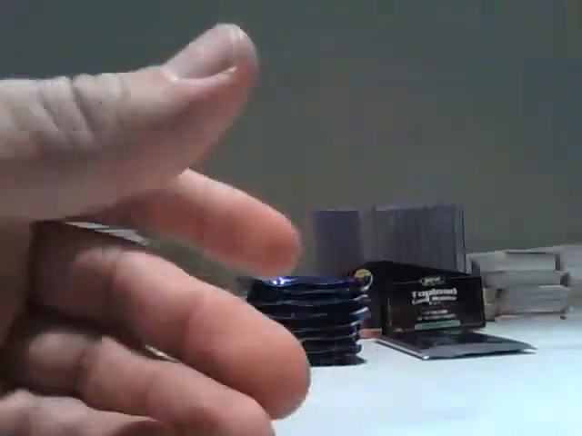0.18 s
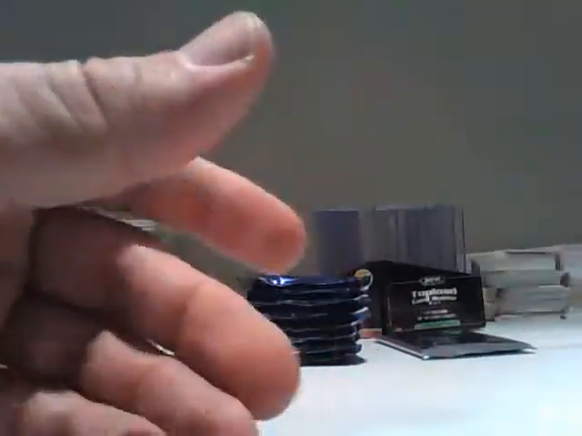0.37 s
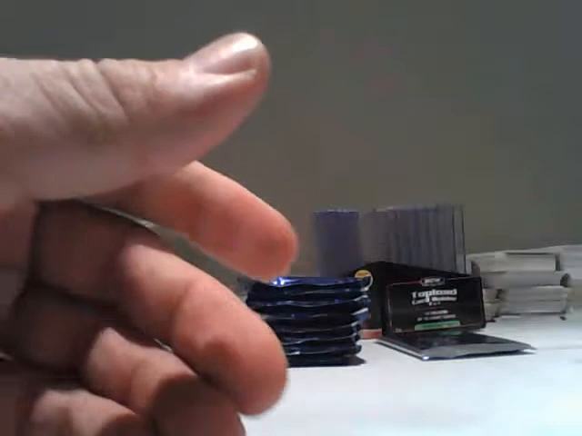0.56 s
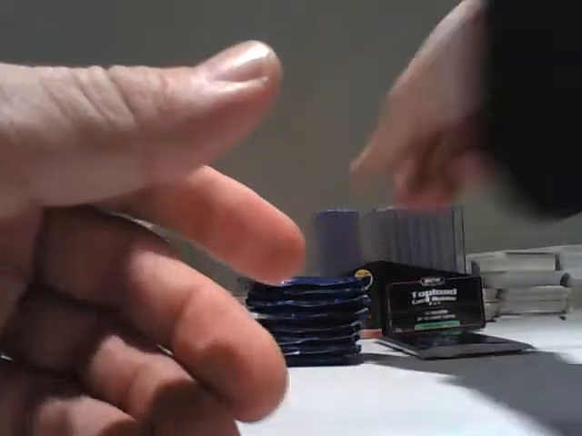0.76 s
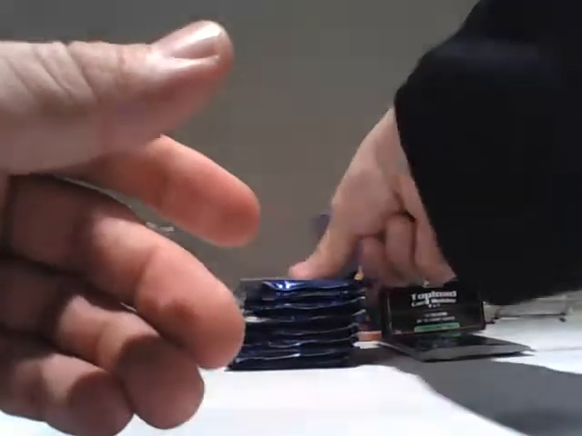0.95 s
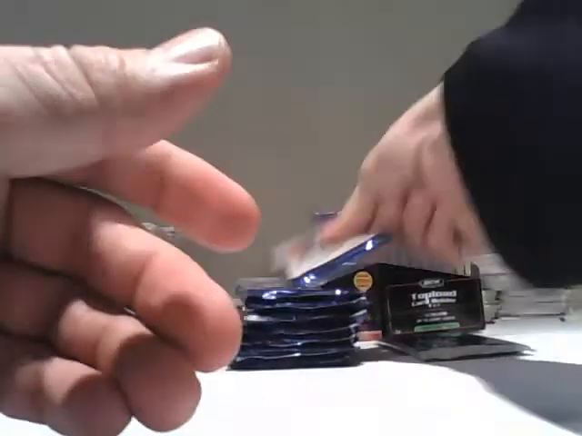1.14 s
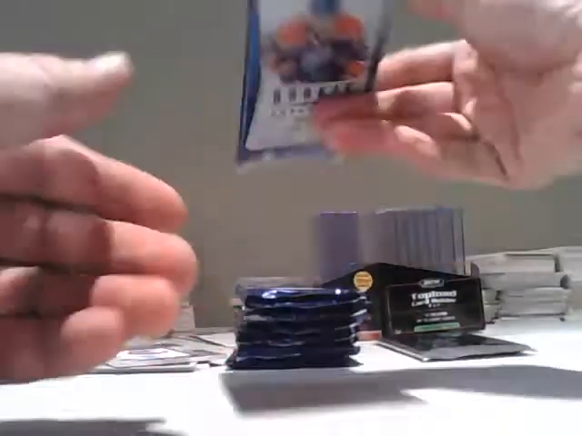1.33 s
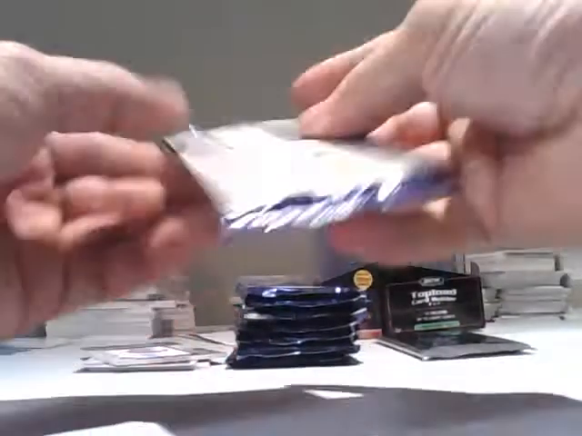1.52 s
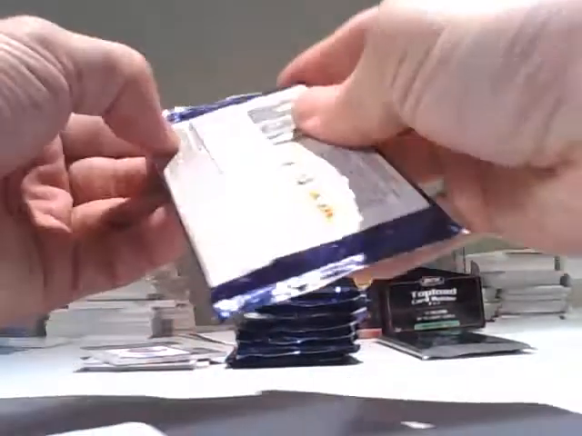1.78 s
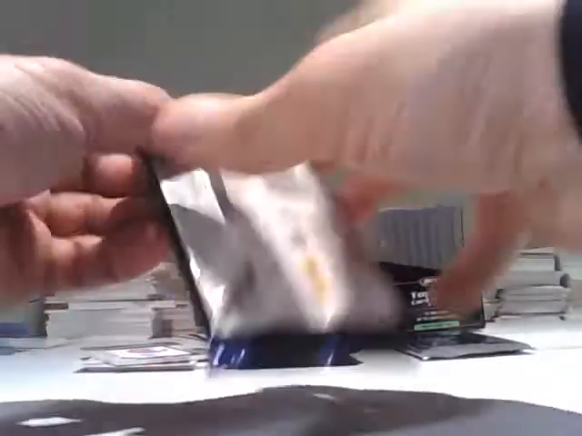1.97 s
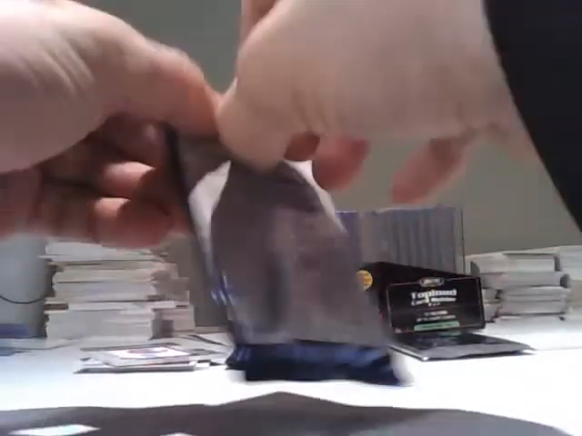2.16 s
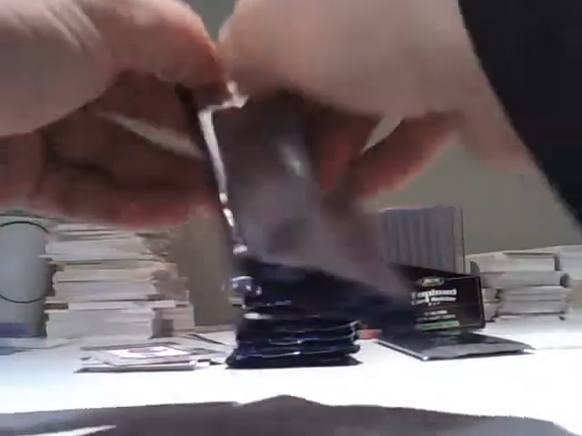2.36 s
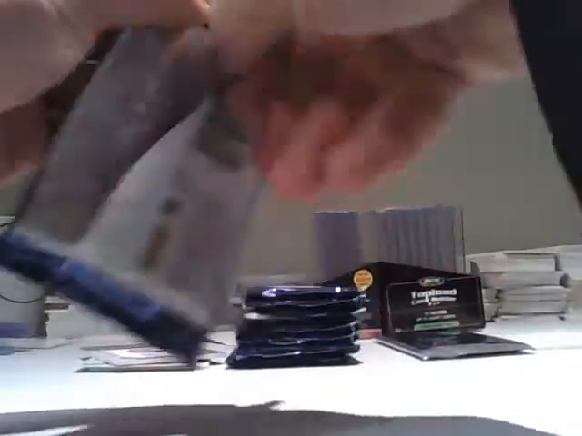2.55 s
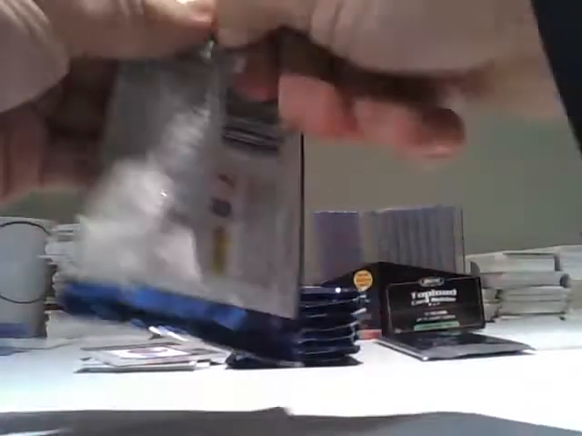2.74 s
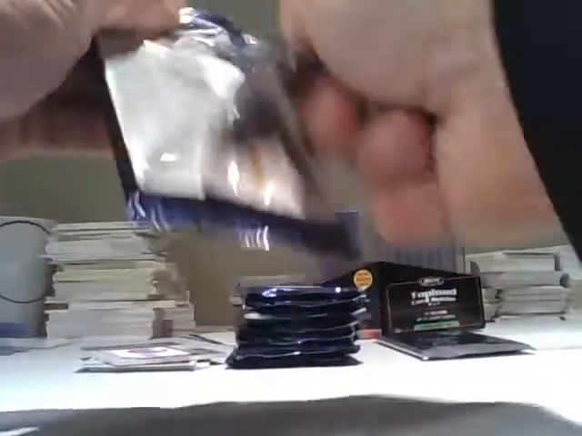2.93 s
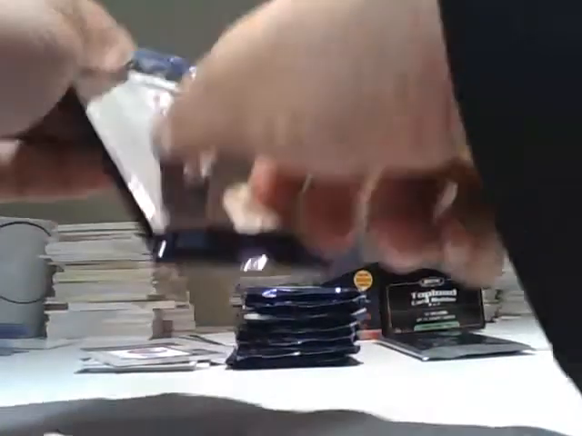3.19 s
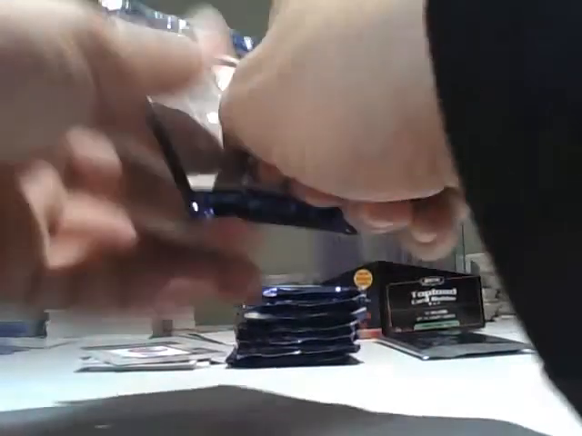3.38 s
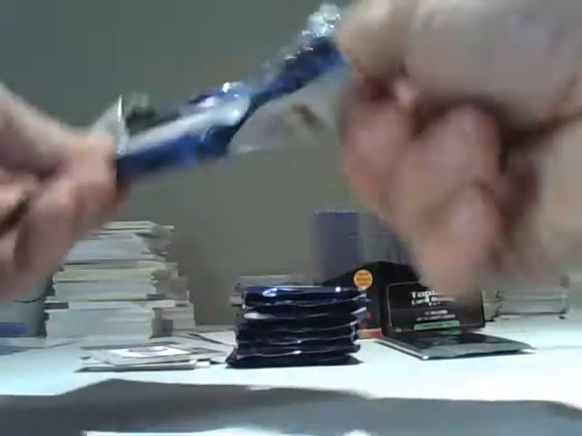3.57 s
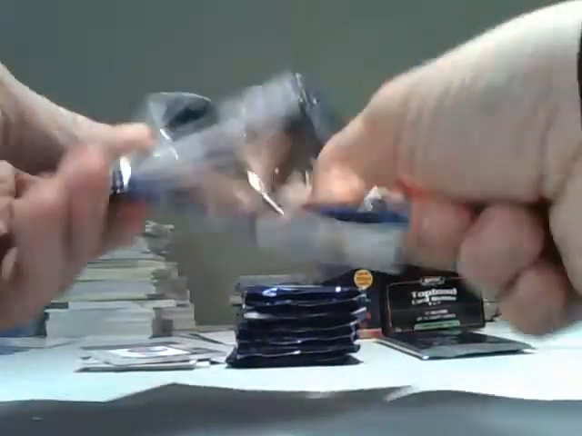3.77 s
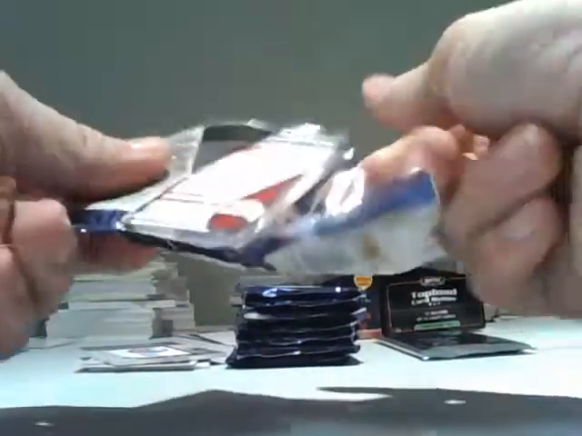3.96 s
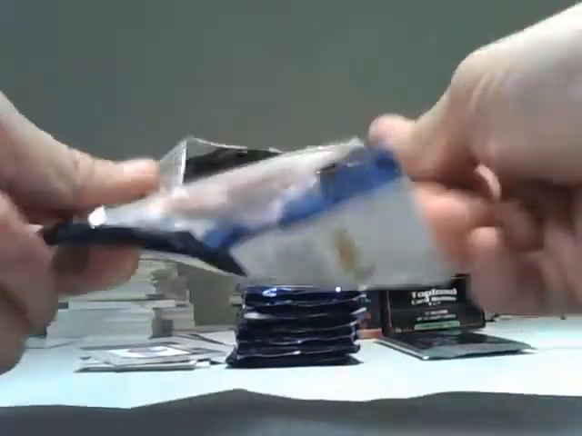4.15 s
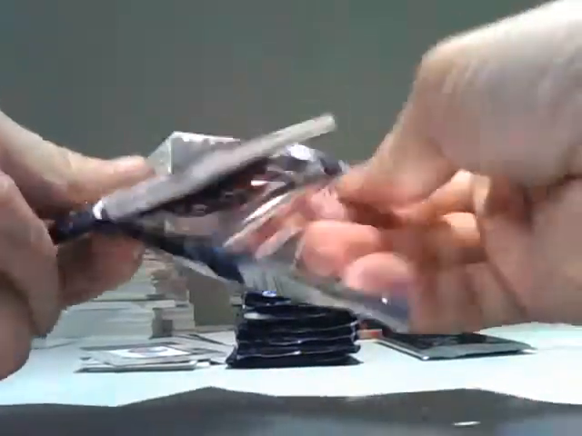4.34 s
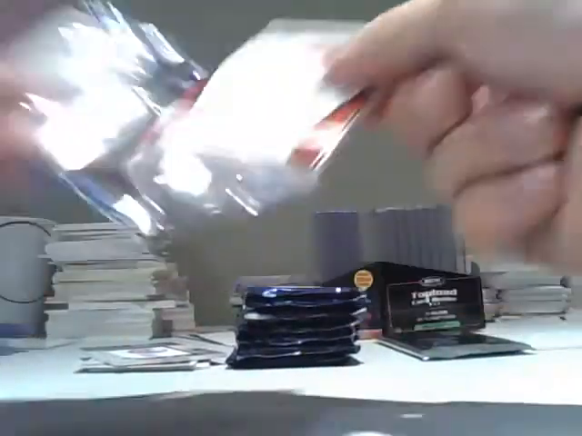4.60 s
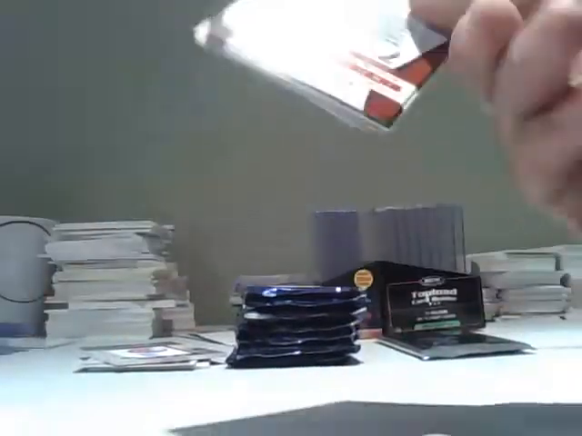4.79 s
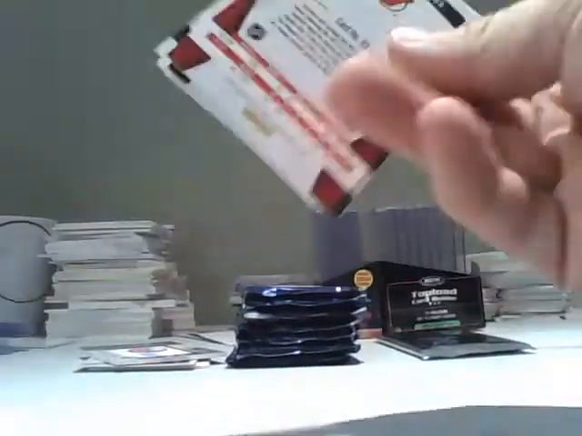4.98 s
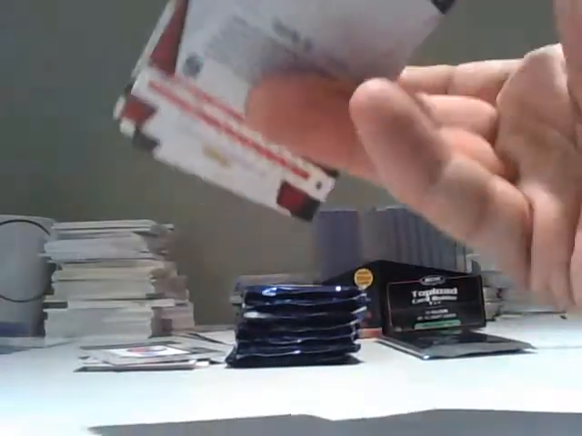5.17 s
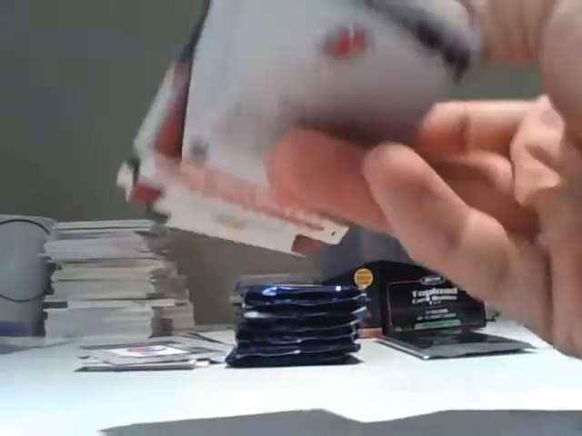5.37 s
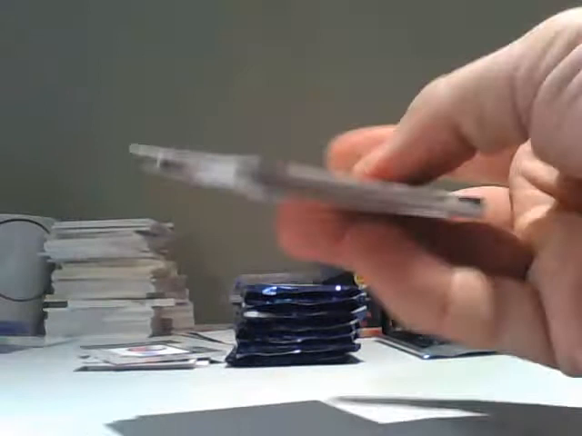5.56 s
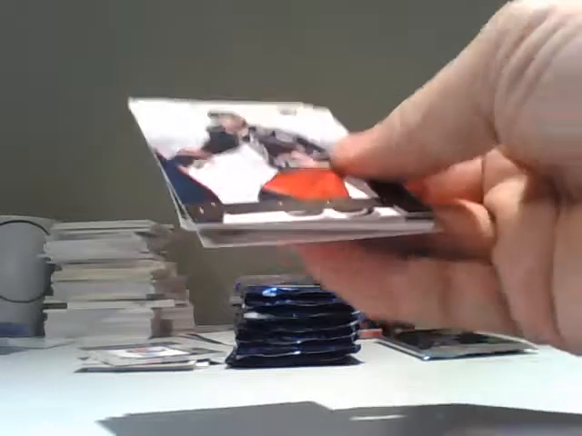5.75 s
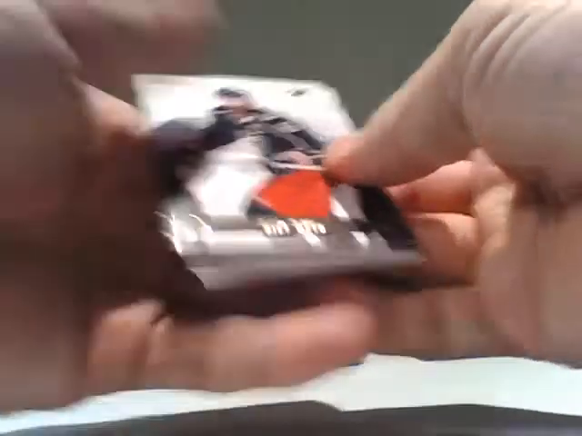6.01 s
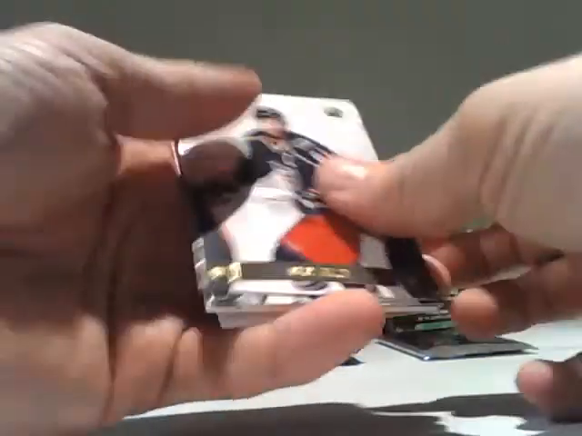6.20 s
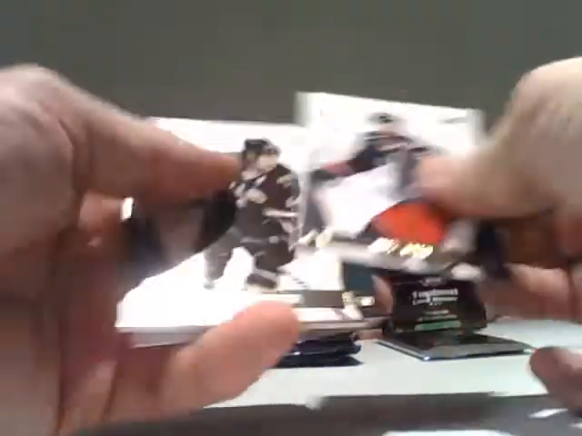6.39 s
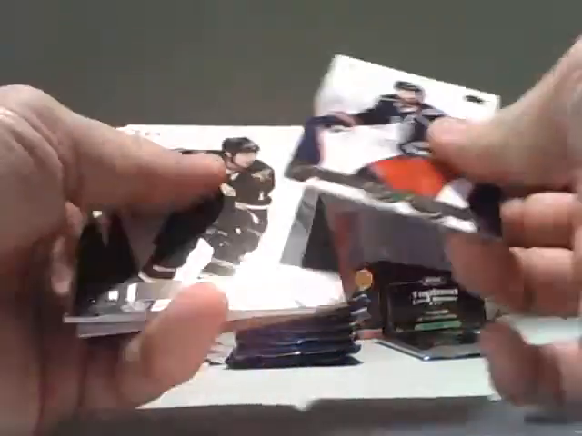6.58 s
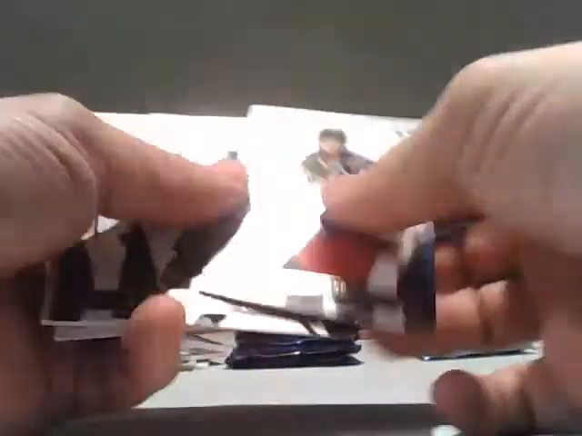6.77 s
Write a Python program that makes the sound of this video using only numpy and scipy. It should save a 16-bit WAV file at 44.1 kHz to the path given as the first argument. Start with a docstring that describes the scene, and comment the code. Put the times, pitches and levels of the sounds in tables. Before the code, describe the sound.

Close, dry foil crackling and popping as a card pack is ripped open, after one card-stack smack; low fan hum, brief dropouts, faint late whine.

```python
"""Cards dropped, foil pack torn open

A stack of trading cards is dropped on a table; then a foil pack is gripped, torn open and peeled off its cards.
Foil and cards are short bursts of noise with the pitch of each stiff patch, popping panels and ringing sines.
They sit close to a small microphone in a small room, over a humming fan and, late on, a thin electrical tone.
The whole sound dips briefly now and then."""
import sys
import numpy as np
from scipy import signal
from scipy.fft import rfft, irfft
from scipy.io import wavfile
from scipy.ndimage import uniform_filter1d

SR = 44100
rng = np.random.default_rng(int(sys.argv[2]) if len(sys.argv) > 2 else 0)


def unload_wav(signal):
    """Save mono or channel-first audio to the path in sys.argv[1] as 16-bit WAV at rate SR, clipped to [-1, 1]."""
    wavfile.write(
        sys.argv[1],
        SR,
        np.round(np.clip(np.atleast_2d(signal).T, -1, 1) * 32767).astype(np.int16),
    )


N = 301157  # length in samples

# colour of a buckling crease, used for snaps and crackle: f/Hz, relative level/dB (per Hz)
CREASE = [(500, -15.5), (1200, -4), (2000, -2.5), (2750, -5.5), (3200, -7.5), (4050, -1.5), (5200, -4.5),
          (6500, -1.5), (8200, -3.5), (9200, -14), (10500, -22.5), (12500, -28)]
# the loudest foil snaps: t/s, level/dB (before crack_db), f/Hz (pitch of the crease)
SNAPS = [(2.041, -44.5, 2840), (2.0581, -38.5, 2970), (2.0768, -36.5, 3940), (2.2833, -47, 7670),
         (2.2964, -41, 5580), (2.3171, -35, 6240), (2.4705, -31.5, 4350), (2.5133, -22.5, 4480),
         (2.5219, -22, 4700), (2.5626, -28, 3700), (2.6356, -29, 4350), (2.6479, -28.5, 5070),
         (2.703, -32.5, 3780), (3.0574, -33, 2900), (3.1085, -28, 2700), (3.1318, -25.5, 3530),
         (3.1494, -28, 2030), (3.436, -33.5, 3150), (3.5706, -29, 3730), (3.6102, -24.5, 3930),
         (3.6398, -24.5, 3140), (3.6511, -21.5, 4100), (3.683, -20.5, 4200), (3.6963, -20, 2800),
         (3.7891, -29, 5470), (3.82, -30, 3800), (3.8657, -31.5, 2870), (3.9219, -32.5, 4180),
         (3.9853, -34.5, 3800), (4.0946, -40, 3800), (4.2438, -41, 2380), (4.2513, -27.5, 4200),
         (4.335, -28, 3020), (4.354, -30, 4830), (4.4598, -38, 3860), (4.6237, -33.5, 4550),
         (4.7275, -36.5, 4260)]


def foil_snaps(crack_db=-8, decay_s=0.0047, yielding_s=0.0025):
    """A crease starts to yield, then gives way in a quick run of cracks at the pitch of its facet."""
    out = np.zeros(N)
    for s, db, hz in SNAPS:
        pitch = facet(hz, peak_db=12.5, width=0.13)
        snap = burst(CREASE, decay_s, pitch, yielding_s)
        add(out, s - yielding_s / 3, amp(db + crack_db) * snap)
    return out


# colour of the flexing wrapper, used for pops and crumple: f/Hz, relative level/dB (per Hz)
FLEX = [(120, -19), (250, -1.5), (400, -14), (550, -0.5), (700, 1.5), (850, 8), (1000, 1), (1200, 3),
        (1500, -10), (2000, -8.5), (3000, -35.5), (6000, -47.5)]
# whole panels of the wrapper pop in or out: t/s, level/dB (before pop_db and flap_db), f/Hz (pitch)
POPS = [(2.496, -38, 890), (2.523, -25, 886), (2.562, -35, 830), (2.636, -29, 836), (3.036, -31.5, 953),
        (3.15, -27, 890), (3.599, -28.5, 750), (3.613, -36.5, 664), (3.645, -24, 790), (3.686, -17, 625),
        (3.695, -11.5, 840), (3.705, -20.5, 916), (3.713, -17, 838), (3.761, -31, 965), (3.824, -30.5, 770),
        (3.879, -30, 1230), (3.985, -33.5, 853), (4.027, -38.5, 796), (4.21, -35.5, 786),
        (4.249, -24.5, 750), (4.291, -34, 795), (4.336, -25.5, 885), (4.354, -28.5, 860), (4.459, -34, 730)]


def foil_pops(pop_db=-4, flap_db=-12, flap_decay_s=0.011, rise_s=0.0009):
    """A panel flips through: a few cycles of its own pitch, and a flutter of the sheet around it."""
    t, out = np.arange(2048) / SR, np.zeros(N)
    for s, db, hz in POPS:
        swell = t / rise_s * np.exp(1 - t / rise_s)
        flip = swell * np.sin(2 * np.pi * hz * t)
        flutter = burst(FLEX, flap_decay_s, rise_s=rise_s)
        add(out, s, amp(db + pop_db) * flip + amp(db + flap_db) * flutter)
    return out


# each pull builds, holds and lets go; then the foil keeps ticking as it settles
GRAB_DB_PER_S, LET_GO_DB_PER_S = 1100, 600
SETTLE_DB, SETTLE_DB_PER_S = -8.5, 120.5


def pull_db(t, hold_s):
    """Level of one pull, t seconds after it takes hold: grab, hold, let go, settle."""
    after = np.maximum(t - hold_s, 0)
    grab = GRAB_DB_PER_S * np.minimum(t, 0)
    let_go = -LET_GO_DB_PER_S * after
    settle = SETTLE_DB - SETTLE_DB_PER_S * after
    return grab + np.maximum(let_go, settle)


# pulls of the fingers on the wrapper: t/s (takes hold), hold t/s, level/dB (force),
# level/dB (fine creases over coarse ones), level/dB (flexing of the sheet, on top of the force)
PULLS = [(1.974, 0.085, -63, -8, -6), (2.049, .025, -49.5, -6.5, -4), (2.193, 0.033, -71.5, -7, 12.5),
         (2.32, 0.064, -59, 27, -2.5), (2.511, 0.023, -38.5, 11, -6), (2.698, .022, -47.5, -7, -5.5),
         (2.772, .035, -54, 3.5, 0), (3.022, 0.052, -42, -9, -7), (3.13, 0.024, -35.5, -13, -2.5),
         (3.403, 0.023, -54.5, 0, 0.5), (3.573, .008, -42.5, 18.5, -2.5), (3.614, 0.094, -35, -2, 2),
         (3.687, .034, -36, -14, 4.5), (3.825, .05, -47.5, 4, 6.5), (3.936, .07, -53, 7, 5.5),
         (4.081, .04, -59, 6, 4), (4.201, .025, -52.5, 4.5, -4), (4.242, 0.014, -39.5, -7.5, 2),
         (4.332, 0.017, -50, 2.5, 7), (4.387, .03, -49, -12, 4), (4.455, .03, -50.5, 5, -7),
         (4.61, .01, -54.5, 17, -2.5), (4.744, .03, -54, -3.5, 1.5)]


def foil_crumple(crackle_db=-5, flex_db=-6, count=14):
    """Many small creases give way while the fingers pull on the wrapper."""
    t, levels, out = np.arange(N) / SR, np.zeros((3, N)), np.zeros(N)
    for s, hold_s, db, fine_db, sheet_db in PULLS:
        near = abs(t - s) < 1
        force = amp(db + pull_db(t[near] - s, hold_s))
        shares = amp([[-fine_db / 2], [fine_db / 2], [sheet_db]])
        levels[:, near] = np.maximum(levels[:, near], force * shares)  # the strongest pull wins
    coarse, fine, flex = levels
    creases = crackle(per_s=400, spread_db=5, rub=0.1)
    # the buckling jumps from facet to facet every few milliseconds, and each has its own pitch
    jumps = np.cumsum(rng.random(N) < 300 / SR)
    active = rng.integers(0, count, N)[jumps]
    for k, hz in enumerate(np.geomspace(1450, 8400, count)):
        small = k / (count - 1)  # 0 = largest facet, 1 = smallest
        grain = burst(CREASE, 0.0011, facet(hz, peak_db=17, width=0.2), rise_s=0.001)
        drive = creases * (active == k) * coarse ** (1 - small) * fine ** small
        out += signal.oaconvolve(drive, grain / np.linalg.norm(grain))[:N]
    return amp(crackle_db) * out + amp(flex_db) * colour(creases * flex, FLEX)


# what rings on around the pack: f/Hz, level/dB (before ring_db), t60 t/s (time to fade by 60 dB)
RINGS = [(568, -45.5, 0.11), (723, -50.5, 0.45), (818, -56, 0.58), (790, -60.5, .2), (999, -41, 0.075),
         (1210, -48.5, 0.1), (2840, -51, 0.17), (3800, -45, 0.24)]


def pack_ringing(foil, ring_db=-6):
    """The foil sound sets fading tones ringing around the pack."""
    return signal.oaconvolve(foil, ring(RINGS))[:N] * amp(ring_db)


# the cards skid, louder and louder as the stack comes down
SKID_FROM_S, LANDING_S = 0.487, 0.534
SKID_DB, SKID_SWELL_DB, SKID_STOP_DB_PER_S = -58, 16, 2400
# card sliding on card: f/Hz, relative level/dB (per Hz)
SKID = [(300, 12.5), (1000, 4.5), (2000, -3.5), (3300, 1.5), (4200, -11.5), (7000, -20.5), (11000, -39)]
# colour of the card edges: f/Hz, relative level/dB (per Hz)
EDGES = [(500, 8), (1900, 1), (2400, -2.5), (2900, -1.5), (3700, 7.5), (5200, 1.5), (6500, -14.5),
         (9000, -21.5), (12000, -32.5)]
# colour of the flat slap: f/Hz, relative level/dB (per Hz)
SLAP = [(200, 0), (500, -1), (800, 2.5), (1150, -5.5), (1500, -4), (2100, -16), (4000, -46.5)]
# tones of the struck table top: f/Hz, level/dB (before each thump), t60 t/s (time to fade by 60 dB)
TABLE = [(126, -19, 0.29), (159, -14, 0.29), (217, -2.5, 0.063), (247.3, -6.5, 0.11), (344, -8.5, .08),
         (393, -11, 0.065), (578, -17.5, 0.17), (650, -11, 0.069), (796, -16.5, .07), (1478, -18.5, 0.05),
         (2030, -34, 0.18), (2380, -31, .08), (3730, -40, 0.14), (4320, -41, 0.14)]
# blows of the stack on the table: t/s, level/dB (tick of the edges), level/dB (slap of the face),
# f/Hz (pitch of the slap), level/dB (thump of the table)
BLOWS = [(0.451, -63.5, -45, 756, -50), (0.5363, -29.5, -49, 900, -45), (0.5386, -36.5, -20.5, 1154, -43),
         (0.543, -54.5, -51, 1140, -20)]


def card_stack(tick_decay_s=0.0077, slap_decay_s=0.0036):
    """The cards skid, tick on their edges, slap flat and set the table top ringing."""
    t = np.arange(N) / SR
    descent = np.clip((t - SKID_FROM_S) / (LANDING_S - SKID_FROM_S), 0, 1)
    stop_db = SKID_STOP_DB_PER_S * np.clip(t - LANDING_S, 0, 0.5)
    skid = (t > SKID_FROM_S) * amp(SKID_DB + SKID_SWELL_DB * descent ** 1.5 - stop_db)
    out = colour(skid * rng.standard_normal(N), SKID)
    for s, tick_db, slap_db, hz, thump_db in BLOWS:
        add(out, s, amp(tick_db) * burst(EDGES, tick_decay_s))
        add(out, s, amp(slap_db) * burst(SLAP, slap_decay_s, facet(hz, peak_db=16.5, width=0.14)))
        add(out, s, amp(thump_db) * ring(TABLE))
    return out


# how long the room rings at each pitch: f/Hz, t60 t/s (time to fade by 60 dB)
ROOM = [(150, 0.3), (700, 0.13), (2000, 0.43), (4500, 0.31), (9000, 0.25)]


def room(x, wet_db, early_db=-7, early_s=0.012, count=8):
    """A few reflections from the table and hands, then a short diffuse tail."""
    hz, t, z = signal.stft(rng.standard_normal(SR // 2), SR, nperseg=256)
    fade = amp(-60 * t / read(ROOM, hz)[:, None])
    tail = signal.istft(z * fade, SR, nperseg=256)[1]
    tail *= np.minimum(np.arange(len(tail)) / SR / early_s, 1)  # the tail builds up gradually
    echo = amp(wet_db) * tail / np.linalg.norm(tail)
    at = (SR * early_s * rng.uniform(0.11, 1, count)).astype(int)
    echo[at] += amp(early_db) * rng.choice([-1, 1], count) / np.sqrt(count)
    return x + signal.oaconvolve(x, echo)[:N]


FAN_HZ = 46.14  # average shaft rate
AIR_DB = -64.5  # rush of air, before air_db and its swelling
# tones of the four-bladed fan: multiple of the shaft rate, level/dB (rms, before flutter and hum swell)
FAN = [(3, -74.5), (4, -59.5), (5, -80.5), (7, -76), (8, -64.5), (12, -80), (15, -81), (17, -80),
       (18, -82.5), (24, -85.5), (34, -90.5)]
# the hum swells a little while the hands are close: t/s, level/dB (change)
HUM_SWELL = [(0, -0.5), (2.2, -2), (2.7, 3), (4.3, 2.5), (5, -1), (6.8, -1.5)]
# rush of air: f/Hz, relative level/dB (per Hz)
AIR = [(110, 1), (200, 3), (290, -3.5), (400, 0), (500, -6), (1100, -8.5), (1600, -10.5), (2500, -16),
       (4000, -22.5), (6500, -26.5), (8100, -26.5), (10000, -44), (13000, -44)]


def fan(wobble=0.001, flutter_db=1.74, air_db=2, swell_db=1.6):
    """Shaft and blade tones, slightly unsteady, in a rush of air."""
    turns = np.cumsum(FAN_HZ * (1 + wobble * drift(5.8))) / SR
    hum = np.zeros(N)
    for k, db in FAN:
        tone = np.sin(2 * np.pi * (round(k) * turns + rng.random()))
        hum += amp(db + flutter_db * drift(5)) * tone
    hum *= np.sqrt(2) * amp(np.interp(np.arange(N) / SR, *np.transpose(HUM_SWELL)))
    air = colour(rng.standard_normal(N), AIR)
    return hum + amp(AIR_DB + air_db + swell_db * drift(12)) * air


def whine(hz=8000, rms_db=-88, from_s=4.8):
    """A thin electrical tone, a steady sine, that sets in late."""
    t = np.arange(N) / SR
    return np.sqrt(2) * amp(rms_db) * np.sin(2 * np.pi * hz * t) * (t > from_s)


# every dip sinks at the same speed and springs back; record() scales its depth for bass and treble
DIP_FALL_DB_PER_S, DIP_RETURN_S = 2100, 0.011
# brief dips of the whole sound: from t/s, until t/s, level/dB (depth before that scaling)
DIPS = [(.474, .482, -12), (.682, 0.707, -22), (1.13, 1.154, -37), (1.182, 1.217, -31), (1.26, 1.271, -17),
        (1.289, 1.334, -28), (1.467, 1.524, -27), (1.963, 1.971, -15), (2.137, 2.163, -28),
        (2.216, 2.243, -26), (2.266, 2.279, -17), (2.375, 2.476, -26.5), (2.652, 2.673, -13),
        (2.823, 2.982, -34), (2.987, 3.026, -6), (3.103, 3.118, -8), (3.338, 3.395, -31),
        (3.789, 3.809, -8.5), (4.139, 4.196, -30), (4.365, 4.393, -7), (4.647, 4.703, -31.5),
        (4.794, 4.835, -30), (4.97, 5.01, -28), (5.1, 5.138, -26), (5.227, 5.266, -28)]


def dips():
    """Gain that sinks steadily to the bottom of each dip, stays there and quickly comes back."""
    t, db = np.arange(N) / SR, np.zeros(N)
    for start, end, depth_db in DIPS:
        sunk = np.maximum(-DIP_FALL_DB_PER_S * np.maximum(t - start, 0), depth_db)
        db += sunk * np.clip(1 - (t - end) / DIP_RETURN_S, 0, 1)
    return amp(db)


def facet(hz, peak_db, width, size=2048):
    """Resonance of one stiff patch of foil or card, in dB; the width is a share of its pitch."""
    away = (np.fft.rfftfreq(size, 1 / SR) / hz - 1) / width
    return peak_db / (1 + away ** 2)


def burst(points, decay_s, extra_db=0, rise_s=1e-5, size=2048):
    """A quick run of tiny impacts that builds and dies, with the energy of a 2 ms sound of rms 1."""
    t = np.arange(size) / SR
    shape = (1 - np.exp(-t / rise_s)) * np.exp(-t / decay_s)
    x = colour(rng.choice([-1, 1], size) * shape, points, extra_db)
    return x / np.linalg.norm(x) * np.sqrt(SR / 500)


def crackle(per_s, spread_db, rub):
    """Clicks of very uneven size over a soft rubbing noise, steady in mean power."""
    size = amp(spread_db * np.minimum(rng.exponential(1, N), 4))
    clicks = size * rng.choice([-1, 1], N) * (rng.random(N) < per_s / SR)
    x = evened(clicks) + rub * rng.standard_normal(N)
    return x / np.sqrt(uniform_filter1d(x ** 2, size=1100) + 1e-9)  # evens out over 25 ms


def ring(modes):
    """Dying sines of a struck body, half a second long."""
    t = np.arange(SR // 2) / SR
    return sum(amp(db - 60 * t / t60) * np.sin(2 * np.pi * hz * t) for hz, db, t60 in modes)


def drift(rate_hz):
    """Slow random wander of rms 1, made of noise with little left above the given rate."""
    spectrum = rfft(rng.standard_normal(N))
    return evened(irfft(spectrum / (1 + (np.fft.rfftfreq(N, 1 / SR) / rate_hz) ** 4), N))


def colour(x, points, extra_db=0, size=2048):
    """Causal filter of unit energy with the given spectrum, plus any extra resonances."""
    half = np.log(amp(read(points, np.fft.rfftfreq(size, 1 / SR)) + extra_db))
    both_sides = np.r_[half, half[-2:0:-1]]
    # minimum phase: the energy comes as early as the spectrum allows
    spectrum = np.exp(np.conj(signal.hilbert(both_sides)))
    taps = np.fft.ifft(spectrum).real[:size // 2]
    return signal.oaconvolve(x, taps / np.linalg.norm(taps))[:len(x)]


def read(points, hz):
    """Reads a table on a log-frequency axis."""
    f, value = np.transpose(points)
    return np.interp(np.log(hz + 1), np.log(f + 1), value)


def add(mix, s, sound):
    """Adds a sound at time s."""
    part = mix[round(s * SR):][:len(sound)]
    part += sound[:len(part)]


def evened(x):
    """Scales to rms 1."""
    return x / np.sqrt(np.mean(x ** 2) + 1e-20)


def amp(db):
    """Decibels to gain."""
    return 10 ** (np.asarray(db) / 20)


def scene():
    """Foil and cards in the room, over the fan and the thin tone."""
    foil = foil_snaps() + foil_pops() + foil_crumple()
    foil = foil + pack_ringing(foil)
    near = room(foil, wet_db=-7) + room(card_stack(), wet_db=-19.5, early_db=-17.0)
    return (near + fan() + whine())[None]


def record(dry, top_hz=10300, hiss_db=-85, rest_db=-102, split_hz=600, bass_depth=1.76, treble_depth=0.83,
           bass_hz=119, edge_hz=15600):
    """A narrow-band microphone with a little hiss, the brief dips, a steep bass cut and the band limit."""
    hz = np.fft.rfftfreq(N, 1 / SR)
    heard = rfft(dry) / np.sqrt(1 + (hz / top_hz) ** 20)
    heard = heard + amp(hiss_db) * rfft(rng.standard_normal(N))
    bass, gain = 1 / (1 + (hz / split_hz) ** 4), dips()
    # the bass sinks deeper in a dip than the treble does
    low = irfft(heard * bass, N) * gain ** bass_depth
    high = irfft(heard * (1 - bass), N) * gain ** treble_depth
    bass_cut = np.maximum(1 / np.sqrt(1 + (bass_hz / (hz + 1)) ** 36), amp(-36))
    x = irfft(rfft(low + high) * bass_cut, N)
    x = x + amp(rest_db) * rng.standard_normal(N)  # faint noise that does not dip
    band_limit = signal.firwin(511, edge_hz, window=("kaiser", 9), fs=SR)
    return signal.oaconvolve(x, band_limit[None], "same")


dry = scene()
out = record(dry)
unload_wav(out)
```